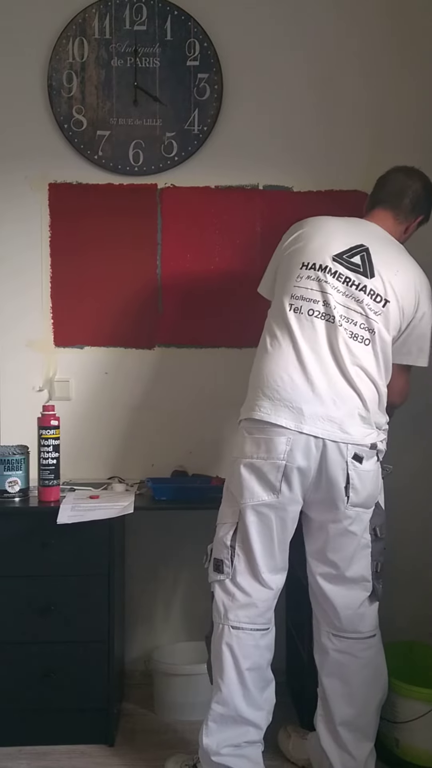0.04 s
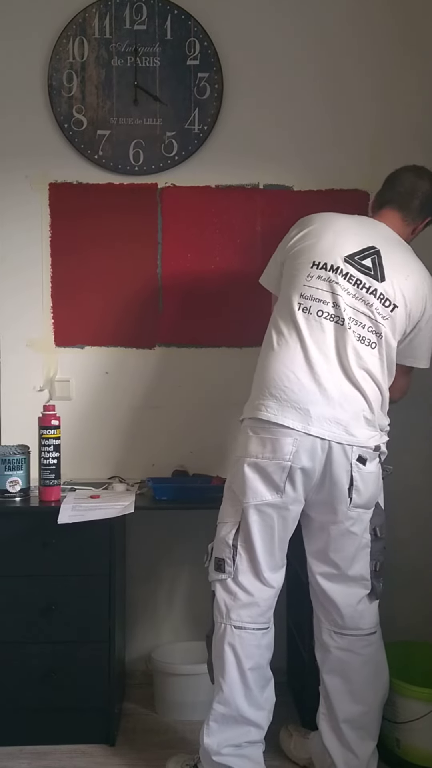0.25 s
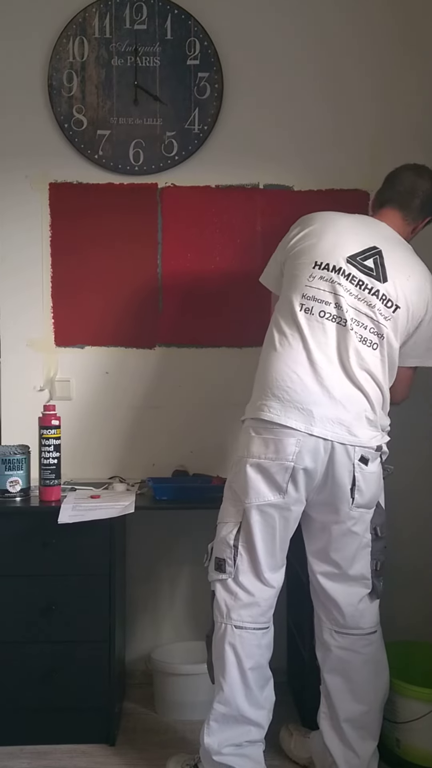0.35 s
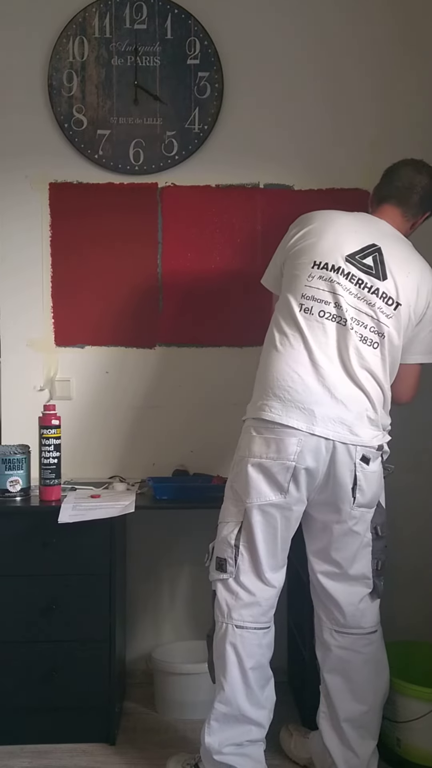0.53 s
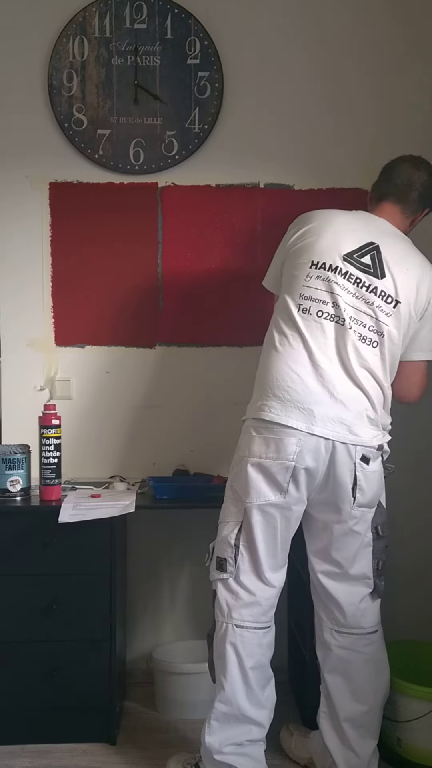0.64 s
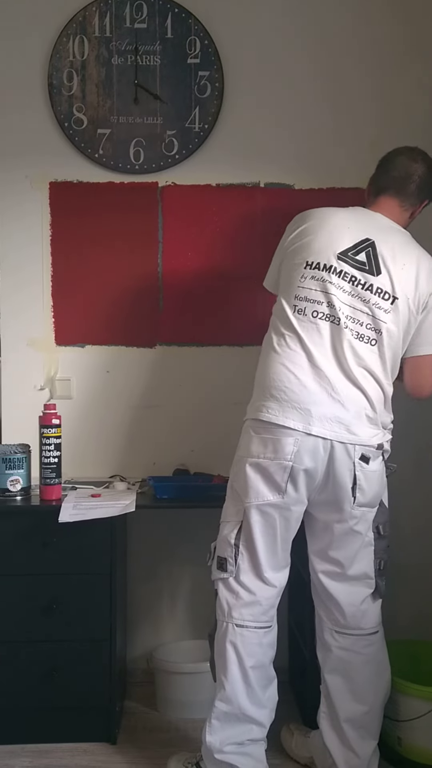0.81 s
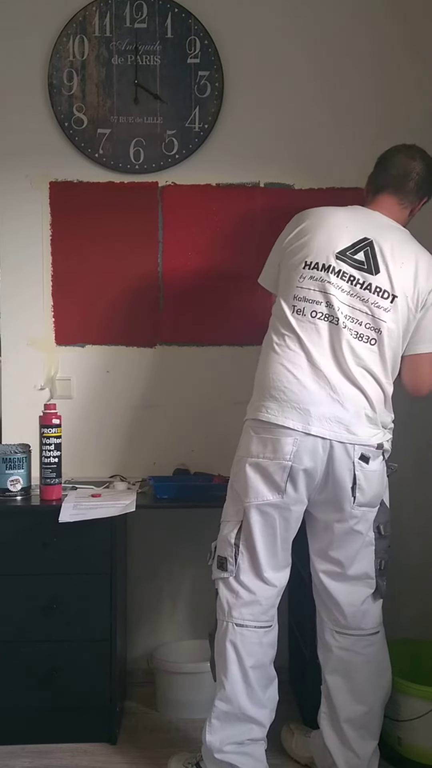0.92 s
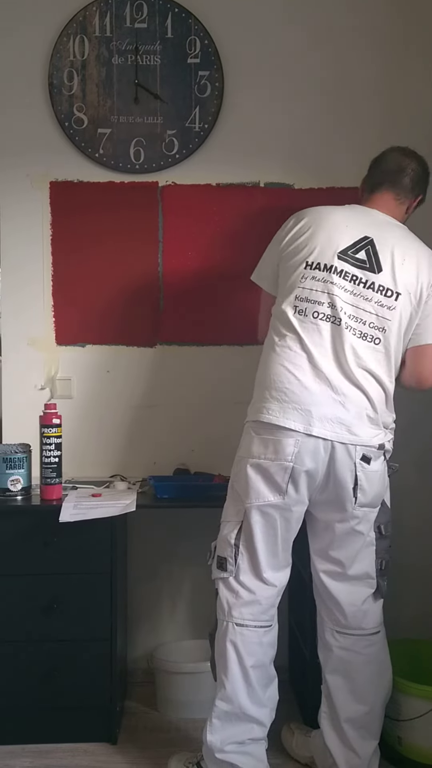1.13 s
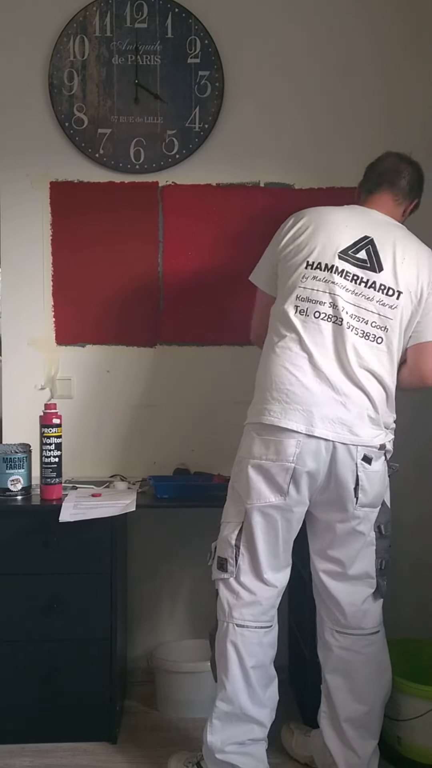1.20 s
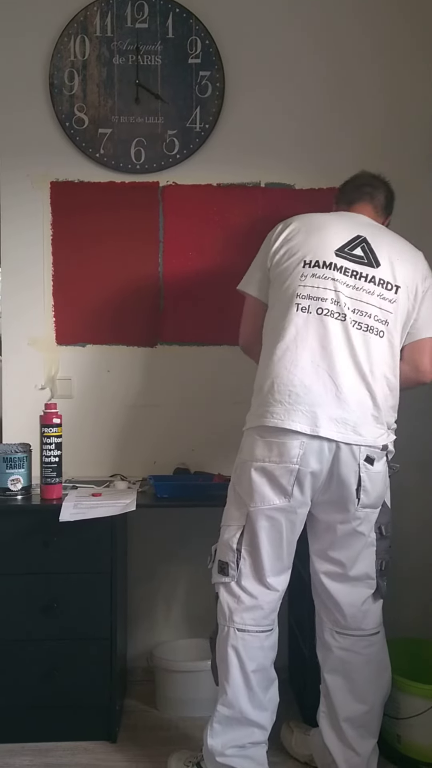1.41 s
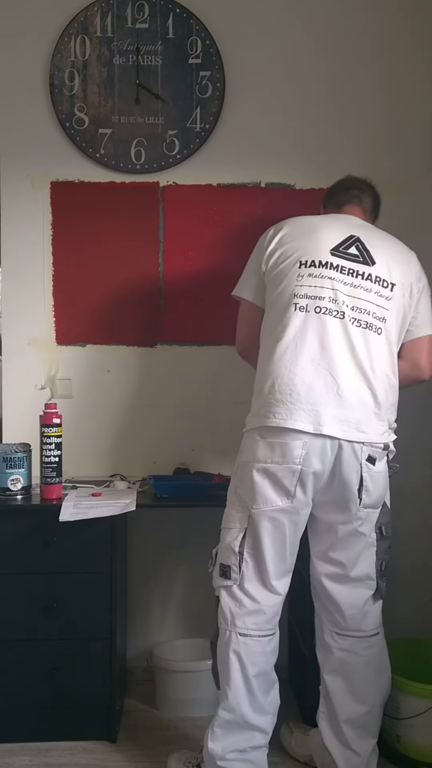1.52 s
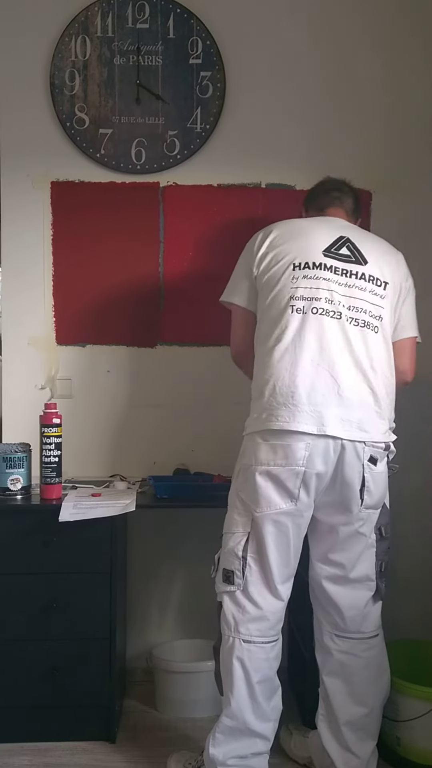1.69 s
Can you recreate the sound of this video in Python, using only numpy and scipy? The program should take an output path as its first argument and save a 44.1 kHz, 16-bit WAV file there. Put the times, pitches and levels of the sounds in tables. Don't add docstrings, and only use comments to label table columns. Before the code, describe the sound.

Crackly ripping of paper tape being peeled from an indoor wall in several short tearing bursts

```python
import sys
import numpy as np
from scipy import signal
from scipy.fft import rfft, irfft, next_fast_len
from scipy.io import wavfile
from scipy.ndimage import map_coordinates

SR = 44100
rng = np.random.default_rng(int(sys.argv[2]) if len(sys.argv) > 2 else 0)


def linear_from_db(decibels):
    return 10 ** (np.asarray(decibels, float) / 20)


def dump_mix(stems):
    frames = np.atleast_2d(stems).T
    limited = np.clip(frames, -1, 1)
    pcm = np.round(limited * 32767).astype(np.int16)
    wavfile.write(sys.argv[1], SR, pcm)


N = 77175


def unit(x):
    return x / np.sqrt(np.mean(x ** 2) + 1e-20)


def along(points, hz):
    f, v = np.transpose(points)
    return np.interp(np.log(hz + 1), np.log(f + 1), v)


def wobble(rate_hz):
    return map_coordinates(rng.standard_normal(N // 20), [np.arange(N) * rate_hz / SR])


def grid():
    size = next_fast_len(N + SR // 4)
    return size, np.fft.rfftfreq(size, 1 / SR)


def filtered(x, response):
    size, hz = grid()
    return irfft(rfft(x, size) * response(hz), size)[..., :N]


def resonance(f, centre_hz, width_hz):
    return 1j * f * width_hz / (centre_hz ** 2 - f * f + 1j * f * width_hz)


def arch(t, start_s, length_s):
    return np.sin(np.pi * np.clip((t - start_s) / length_s, 0, 1))


def hum():
    # (frequency [Hz], level per Hz [dB])
    colour = [(25, -3.5), (80, 1.5), (300, -12.5), (1030, -25.5), (1570, -30), (2900, -25.5), (7000, -39),
              (14000, -52)]
    # (frequency [Hz], correlation [0-1])
    likeness = [(40, 0.31), (150, 0.35), (600, 0.18), (2000, 0.086)]
    level_db, sway_db, sway_hz = -58, 2.5, 9.33
    drone_hz, drone_width_hz, drone_db = 160, 4.7, 0

    def mid_side(hz):
        drone = linear_from_db(drone_db) * np.abs(resonance(hz, drone_hz, drone_width_hz))
        angle = np.arccos(np.clip(along(likeness, hz), -1, 1)) / 2
        return linear_from_db(along(colour, hz)) * (1 + drone) * [np.cos(angle), np.sin(angle)]

    pair = rng.standard_normal((2, N)) * linear_from_db(sway_db * wobble(sway_hz))
    mid, side = filtered(pair, mid_side)
    return linear_from_db(level_db) * unit(np.array([mid + side, mid - side]))


def slips(rate_per_s, spread_db):
    happens = rng.random(N) < rate_per_s / SR
    size = rng.exponential(size=N)
    sign = rng.choice([-1, 1], size=N)
    return unit(happens * sign * linear_from_db(spread_db * np.minimum(size, 3)))


def snap_shape(after_s, level_db, t60_s):
    rise_s, hold_s = 0.002, 0.011
    creep_db, creep_t60_s = -22, 0.03
    creep = linear_from_db(creep_db - 60 * np.abs(after_s) / creep_t60_s)
    rise = np.maximum(np.clip(after_s / rise_s, 0, 1), creep)
    return linear_from_db(level_db - 60 * np.maximum(after_s - hold_s, 0) / t60_s) * rise


def tape():
    # (time [s], level [dB], strip ring over hiss [dB], strip ring [Hz], t60 [s])
    snaps = [(0.021, -64.5, 5, 2900, 0.11), (0.033, -64, -10, 3020, 0.18), (0.071, -73, 6, 3000, 0.15),
             (0.109, -82, 15.5, 3000, 0.27), (.2625, -35, -1, 2960, 0.047), (0.314, -37, -8.5, 3180, 0.018),
             (.372, -47.5, -28, 3650, 0.032), (0.465, -35.5, 2, 11500, 0.054),
             (0.498, -41.5, 5, 13300, 0.053), (0.891, -65, -2, 2900, 0.24),
             (1.096, -46.5, 3.5, 2500, 0.038), (1.314, -47.5, 2, 3400, 0.072),
             (1.331, -46.5, -5, 4640, 0.16), (1.531, -52, 6, 4280, 0.047), (1.562, -52, 4.5, 3070, 0.038),
             (1.621, -48, -2, 3350, 0.068), (1.713, -54, -1.5, 3240, 0.038)]
    # (start [s], length [s], level [dB], strip ring over hiss [dB], strip ring [Hz])
    drags = [(0.189, 0.089, -69.5, 7, 1430), (.192, 0.035, -52, 0.5, 2870), (0.207, 0.025, -46, 1, 3130),
             (0.946, .04, -51.5, -14, 3000), (1.425, 0.039, -42, 0, 4710), (0.947, 0.095, -59.5, 4.5, 1930),
             (0.292, 0.21, -41.5, -8.5, 3250), (0.422, 0.065, -41, -15, 4120),
             (.465, 0.075, -35.5, -7.5, 4360), (0.765, 0.044, -67.5, -19, 3020),
             (0.896, 0.066, -63.5, 3, 2940), (.975, .07, -51.5, 9, 2700), (1.024, 0.064, -56.5, 6.5, 2720),
             (1.098, 0.083, -47.5, 3.5, 2920), (1.082, 0.21, -71.5, 10, 900), (1.137, .11, -48.5, 1, 3100),
             (1.218, 0.21, -58.5, 7.5, 2400), (1.281, 0.19, -83.5, 5.5, 505),
             (1.331, 0.099, -51.5, -2.5, 2860), (1.417, 0.046, -50.5, 9, 2700),
             (1.465, 0.042, -51, -7, 4640), (1.64, .08, -57.5, -1.5, 3200),
             (1.699, 0.088, -72.5, 21.5, 4300)]
    # (frequency [Hz], level per Hz [dB])
    hiss_colour = [(500, 0), (900, -9.5), (1500, -3.5), (2600, 0.5), (5000, 0), (7000, 1), (11500, 4.5),
                   (15800, -2)]
    slips_per_s, spread_db, clump_db, clumps_per_s = 16000, 2, 1.6, 600
    ring_trim_db, ring_sharpness, overtone_ratio, overtone_db = -0.5, 3, 1.6, -4.5
    drag_power = 1.73

    t = np.arange(N) / SR
    size, hz = grid()
    glue = unit(slips(slips_per_s, spread_db) * linear_from_db(clump_db * wobble(clumps_per_s)))
    hiss = unit(linear_from_db(along(hiss_colour, hz)))

    shapes = []
    for start_s, level_db, ring_db, ring_hz, t60_s in snaps:
        shapes.append((snap_shape(t - start_s, level_db, t60_s), ring_db, ring_hz))
    for start_s, length_s, level_db, ring_db, ring_hz in drags:
        swell = arch(t, start_s, length_s).clip(0) ** drag_power
        shapes.append((linear_from_db(level_db) * swell, ring_db, ring_hz))

    def ring_power(centre_hz):
        return np.abs(resonance(hz, centre_hz, centre_hz / ring_sharpness)) ** 2

    total = 0
    for shape, ring_db, ring_hz in shapes:
        ring = unit(ring_power(ring_hz) + linear_from_db(overtone_db) * ring_power(overtone_ratio * ring_hz))
        total = total + rfft(glue * shape, size) * np.hypot(hiss, linear_from_db(ring_db + ring_trim_db) * ring)
    return irfft(total, size)[:N]


def answers(count):
    # (frequency [Hz], t60 [s])
    decay = [(150, 0.14), (1000, 0.35), (4000, 0.46), (9000, 0.38), (13000, 0.33), (16000, 0.21)]
    alike_below_hz, gap_s = 740, 0.002
    hz, t, z = signal.stft(rng.standard_normal((2, count, SR // 2)), SR, nperseg=256)
    alike = 1 / (1 + (hz[:, None] / alike_below_hz) ** 2)
    z[0] = alike * z[1] + np.sqrt(1 - alike ** 2) * z[0]
    tails = signal.istft(z * linear_from_db(-60 * t / along(decay, hz)[:, None]), SR, nperseg=256)[1]
    tails = tails * np.clip(np.arange(tails.shape[-1]) / SR / gap_s, 0, 1) ** 2
    return tails / np.linalg.norm(tails, axis=-1, keepdims=True)


def room(x, wet_db, left_db):
    shift_s, count, left_lead_s = 0.04, 12, 0.00032
    place = (np.arange(N) / SR / shift_s - np.arange(count)[:, None] + 1) % count - 1
    pieces = x * np.cos(np.pi / 2 * np.clip(place, -1, 1))
    wet = signal.fftconvolve(pieces[None], answers(count), axes=2).sum(axis=1)[:, :N]

    def to_ports(f):
        return [linear_from_db(left_db) * np.ones(len(f)), np.exp(-2j * np.pi * f * left_lead_s)]

    return filtered(x, to_ports) + linear_from_db(wet_db) * wet


def shuffles():
    # (start [s], length [s], level [dB], board resonance [Hz])
    shifts = [
        (0.233, 0.22, -53.5, 55),
        (.26, 0.085, -52, 122),
        (0.655, 0.12, -65, 85),
        (.76, 0.21, -68.5, 160),
        (1.13, 0.14, -60, 53.4),
        (1.516, 0.19, -57.5, 160),
    ]
    sharpness = 3.2
    t = np.arange(N) / SR

    def board(centre_hz):
        noise = rng.standard_normal(N)
        return unit(filtered(noise, lambda f: resonance(f, centre_hz, centre_hz / sharpness) ** 2))

    return sum(linear_from_db(level_db) * arch(t, start_s, length_s) * board(board_hz)
               for start_s, length_s, level_db, board_hz in shifts)


def panel():
    # (time [s], level [dB], stick-slip rate [Hz])
    drumming = [(.28, -57.5, 189.3), (0.316, -45, 195.4), (0.344, -41.5, 199.4), (.42, -42.5, 199.6),
                (0.471, -48, 238.7), (0.514, -47.5, 276), (0.559, -71, 290.7), (1.079, -93, 299.9),
                (1.14, -61.5, 301.8), (1.26, -66.5, 261.6), (1.36, -61.5, 245), (1.46, -65.5, 244),
                (1.52, -92, 250)]
    # (frequency [Hz], width [Hz], level [dB])
    modes = [(60.4, 26, -7), (119, 29, -4.5), (195.4, 34, -1), (292, 89, -1), (409, 93, -3.5),
             (652, 92, -1), (900, 1300, -9.5)]
    slips_per_s, spread_db, steady_db = 1500, 3, -3.5
    rate_wander, wander_hz, strength_hz = 0.06, 40, 150

    def body(f):
        return sum((-1) ** k * linear_from_db(level_db) * resonance(f, centre_hz, width_hz)
                   for k, (centre_hz, width_hz, level_db) in enumerate(modes))

    time_s, level_db, rate_hz = np.transpose(drumming)
    t = np.arange(N) / SR
    turns = np.cumsum(np.interp(t, time_s, rate_hz) * (1 + rate_wander * wobble(wander_hz))) / SR
    ticks = np.diff(np.floor(turns), prepend=0)
    steady = unit(ticks * linear_from_db(spread_db * wobble(strength_hz)))
    force = slips(slips_per_s, spread_db) + linear_from_db(steady_db) * steady
    return linear_from_db(np.interp(t, time_s, level_db, -120, -120)) * unit(filtered(force, body))


def scene():
    torn = room(tape(), wet_db=1, left_db=-16)
    drummed = room(panel(), wet_db=-2.5, left_db=0.5)
    return hum() + torn + shuffles() + drummed


def band_limit(x):
    return signal.sosfilt(signal.butter(12, 16650, fs=SR, output="sos"), x)


def record(dry):
    # (frequency [Hz], left over right [dB])
    port_tilt = [(30, 2), (90, 4), (180, 0), (380, -4), (700, 1), (1400, 1), (2800, -4), (15000, -10)]
    top_hz = 16115

    def colour(hz):
        return linear_from_db(along(port_tilt, hz) / 2 * np.array([[1], [-1]])) * (hz < top_hz)

    return band_limit(filtered(dry, colour))


dry = scene()
out = record(dry)
dump_mix(out)
```